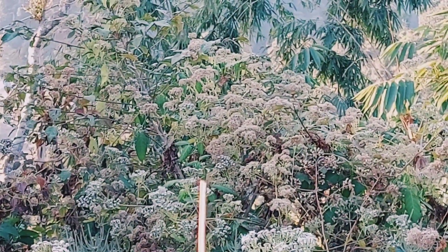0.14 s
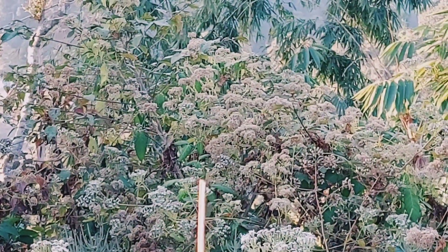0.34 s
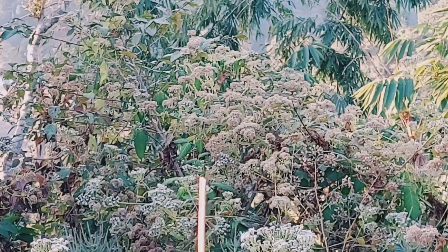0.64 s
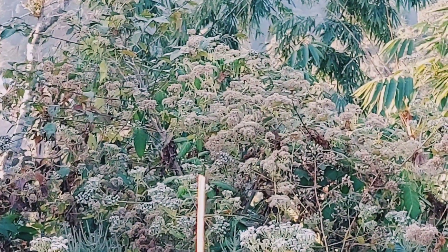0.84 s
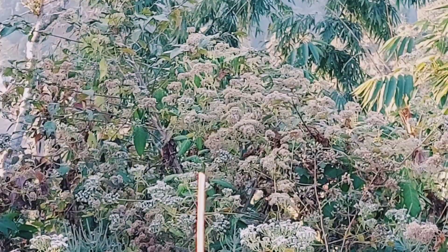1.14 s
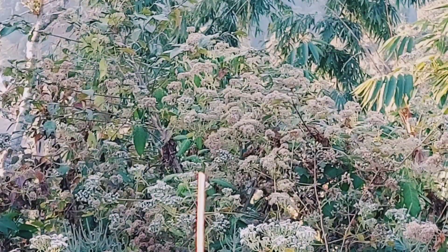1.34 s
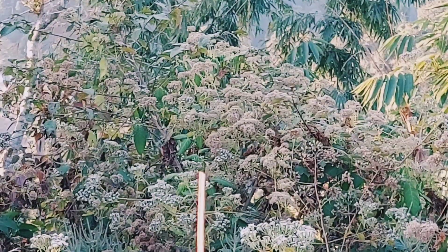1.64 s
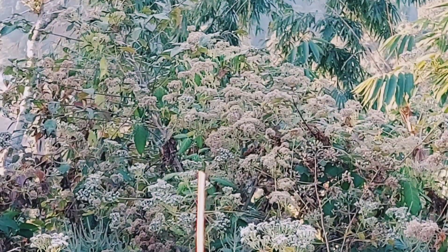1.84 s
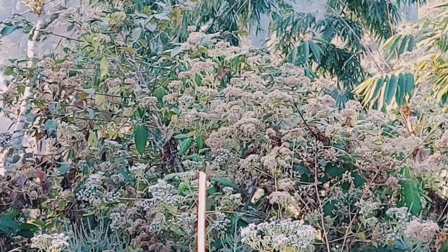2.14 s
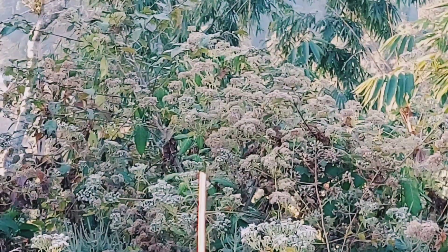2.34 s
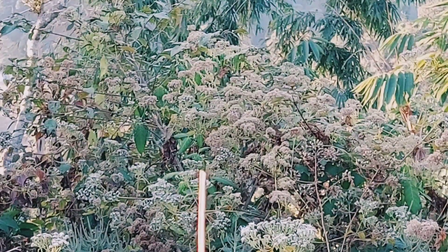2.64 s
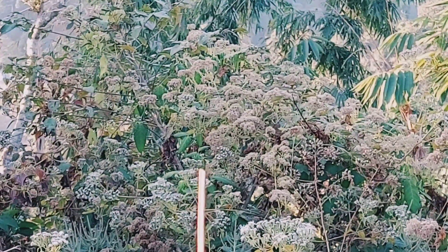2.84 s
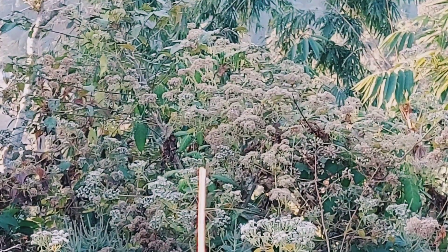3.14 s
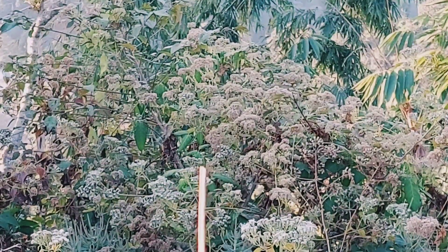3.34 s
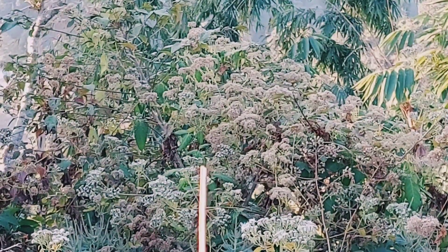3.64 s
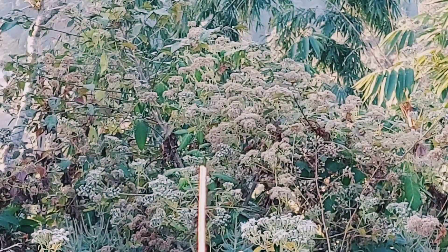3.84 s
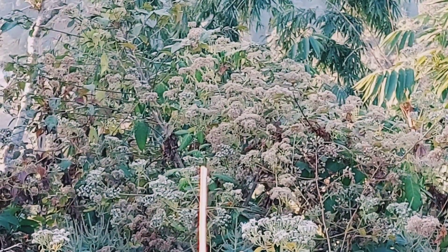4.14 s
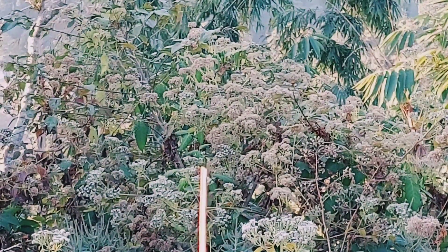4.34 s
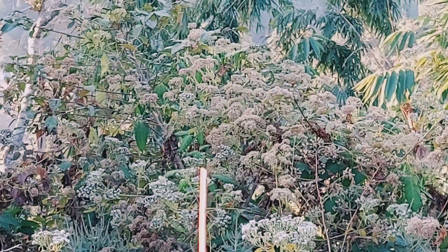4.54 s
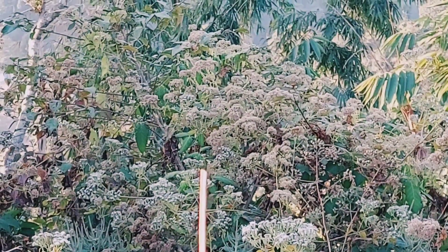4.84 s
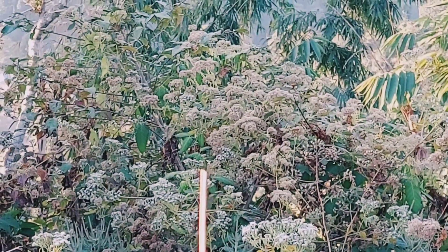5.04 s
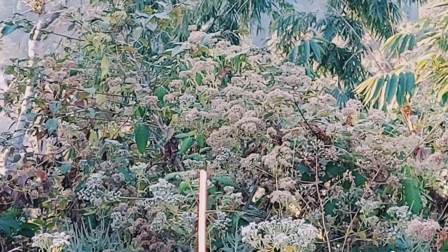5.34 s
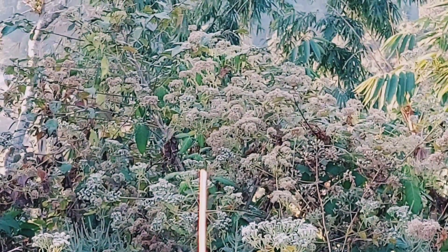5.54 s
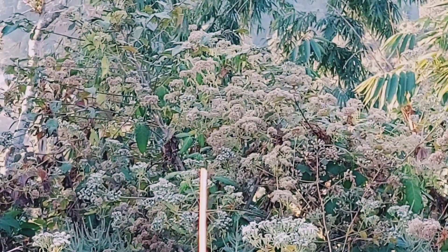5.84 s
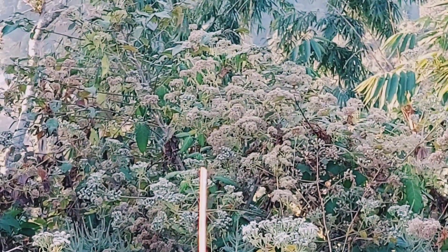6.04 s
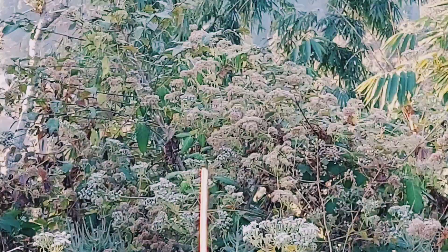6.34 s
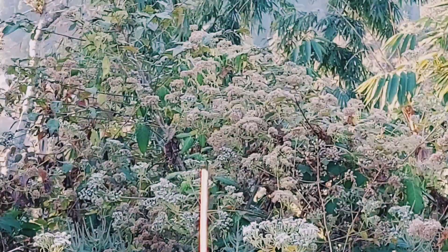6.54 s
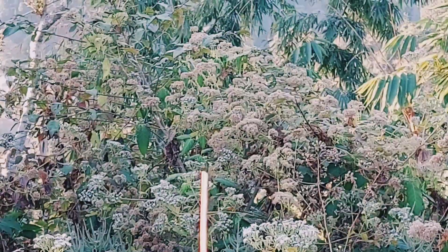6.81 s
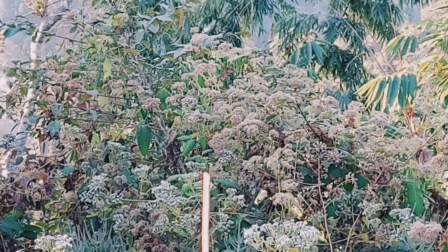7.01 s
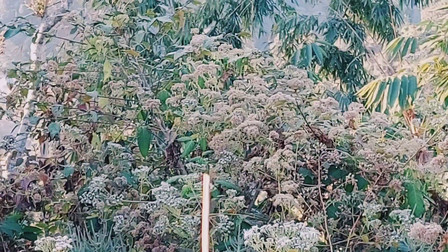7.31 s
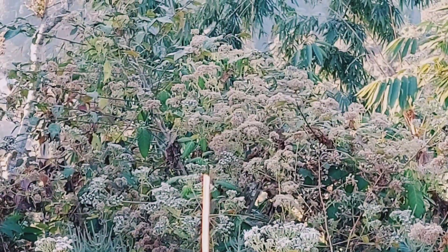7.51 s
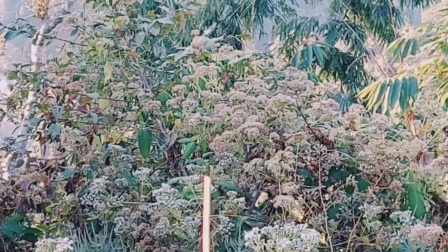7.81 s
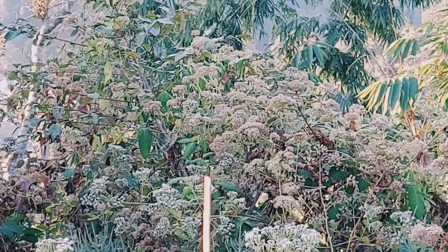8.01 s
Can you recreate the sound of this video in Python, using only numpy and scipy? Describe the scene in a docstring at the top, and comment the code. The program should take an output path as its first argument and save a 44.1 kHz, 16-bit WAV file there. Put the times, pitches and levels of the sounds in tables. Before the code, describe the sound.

Low bubbling bird triplets open, soon joined by a steady steep chirping bird, slurred notes and thin whistles, echoing softly among trees and leaves.

```python
"""A forest edge where birds call together: one repeats a steep chip, two trade low popping triplets,
others add down-slurs, toots and thin high whistles; a few small dry clicks sound close by.
Every note is a nearly pure tone gliding in pitch and level; decaying noise tails scatter it off
trunks and leaves. Shaped stereo noise makes the low rumble, far chorus and insect hiss behind."""
import sys
import numpy as np
from scipy import signal
from scipy.fft import rfft, irfft, next_fast_len
from scipy.io import wavfile
from scipy.ndimage import map_coordinates

SR = 44100
rng = np.random.default_rng(int(sys.argv[2]) if len(sys.argv) > 2 else 0)


def master_out(mix):
    """Clip the mix to full scale and print it as 16-bit PCM to the path in sys.argv[1]."""
    frames = np.transpose(np.atleast_2d(mix))
    ceiling = np.clip(frames, -1, 1)
    pcm = np.round(ceiling * 32767).astype(np.int16)
    wavfile.write(sys.argv[1], SR, pcm)


N = 360297


def amp(db):
    """Decibels to gain."""
    return 10 ** (np.asarray(db) / 20)


def unit(x):
    """Scale to rms 1."""
    return x / np.sqrt(np.mean(x ** 2) + 1e-20)


def along(points, hz):
    """Interpolate (Hz, value) points on a log frequency axis."""
    f, v = np.transpose(points)
    return np.interp(np.log(hz + 1), np.log(f + 1), v)


def sides(pan_db):
    """Left and right gains for a left-minus-right level difference."""
    return amp(np.array([[.5], [-.5]]) * pan_db)


def wobble(knots_per_s, size):
    """A smooth random curve through normally distributed knots."""
    knot_rng = np.random.default_rng(rng.integers(2 ** 31))
    knots = knot_rng.standard_normal(int(size * knots_per_s / SR) + 4)
    return map_coordinates(knots, [np.arange(size) * knots_per_s / SR])


def filtered(x, response):
    """Multiply the spectrum of x by a response of frequency in Hz."""
    m = next_fast_len(N + SR // 2)
    return irfft(rfft(x, m) * response(np.fft.rfftfreq(m, 1 / SR)), m)[..., :N]


def add(track, start_s, sound):
    """Mix a sound into a track, cut at the track's ends."""
    start = round(start_s * SR)
    part = sound[max(-start, 0):N - start]
    track[max(start, 0):][:len(part)] += part


def syrinx(hz, db, waver=0.003, overtone_db=-48):
    """A nearly pure tone that follows a pitch and a level, a little unsteady."""
    unsteady_hz = hz * (1 + waver * wobble(244.5, len(hz)))
    phase = 2 * np.pi * np.cumsum(unsteady_hz) / SR
    tone = np.sin(phase) + amp(overtone_db) * np.sin(2 * phase)
    return amp(db) * signal.windows.tukey(len(hz), .1) * tone


def sing(shape, notes, held=False, overtone_db=-48, flutter_db=2.0):
    """Repeat one note shape, never quite alike: sweeps vary in length, held notes in pitch."""
    knots_s, hz, level_db = np.transpose(shape)
    track = np.zeros(N)
    for start_s, db, factor, *swell_db in notes:
        length, pitch = (1, factor) if held else (factor, 1)
        t = np.arange(int(knots_s[-1] * length * SR)) / SR / length
        effort_db = db + sum(swell_db) * t / knots_s[-1]
        effort_db = effort_db + np.interp(t, knots_s, level_db) + flutter_db * wobble(142.0, len(t))
        note_hz = pitch * np.interp(t, knots_s, hz)
        add(track, start_s, syrinx(note_hz, effort_db, overtone_db=overtone_db))
    return track


def scatter_tail(t60_s, rise_s):
    """Stereo noise of unit energy per ear that builds up, then decays, as many echoes do."""
    t = np.arange(SR) / SR
    noise = rng.standard_normal((2, SR))
    return unit(noise * amp(-60 * t / t60_s) * (1 - np.exp(-(t / rise_s) ** 2))) / np.sqrt(SR)


def forest(voice, pan_db, direct_db, near_db, far_db, lag_s=0., near_t60_s=0.21, far_t60_s=0.91,
           shade=None):
    """One perch's path: direct sound (left ear lag_s later), near-leaf scatter, far-trunk tail."""
    echoes = amp(near_db) * scatter_tail(near_t60_s, 0.0036)
    echoes = echoes + amp(far_db) * scatter_tail(far_t60_s, 0.016)
    direct = sides(pan_db) * np.array([np.roll(voice, round(lag_s * SR)), voice])
    if shade:
        direct = filtered(direct, lambda hz: amp(along(shade, hz)))
    # Echoes arrive from all around, so only the direct sound shows where the bird sits.
    return amp(direct_db) * direct + signal.fftconvolve(voice[None], echoes, axes=1)[:, :N]


def chipper():
    """The nearest bird, to the right, runs through steep chips, slowing; each ends in a soft flick."""
    # Chip shape. Each row: time in s at length factor 1, pitch in Hz, relative level in dB.
    chip = [(0, 4436, 1), (.008, 4134, -6), (.013, 3956, 1.5), (.019, 3700, 1), (.025, 3452, -2.5),
            (.039, 2859, -4), (.054, 2440, -10), (.062, 2099, -18), (.072, 1900, -36), (.081, 2017, -18),
            (.089, 2154, -14), (.098, 1910, -18)]
    # Chips sung. Each row: start in s, level in dB, length factor.
    chip_notes = [(2.337, -35, .84), (2.563, -32, 1.02), (2.8, -32, 1), (3.037, -34, .98),
                  (3.282, -34, .97), (3.539, -33.5, 1.02), (3.79, -34, 1.01), (4.043, -34.5, 1.02),
                  (4.31, -36, 1.03), (4.581, -37.5, 1.02), (4.851, -38, 1.02), (5.14, -38, .98),
                  (5.421, -37.5, 1), (5.701, -36.5, .98), (6.019, -34.5, 1), (6.308, -35.5, .94),
                  (6.601, -36.5, 1.02), (6.909, -37, .99), (7.227, -37, 1.02), (7.552, -40, 1.06),
                  (7.86, -37.5, 1.06)]
    # Foliage colour on the direct path. Each row: frequency in Hz, gain in dB.
    foliage = [(2400, -1), (3100, 0), (3500, 2), (3800, 0), (4050, -6), (4400, -8)]
    voice = sing(chip, chip_notes, flutter_db=3.5)
    return forest(voice, pan_db=-6.5, direct_db=-.5, near_db=-6, far_db=-8, lag_s=-.00036,
                  near_t60_s=.17, far_t60_s=1.05, shade=foliage)


def phrases(figure, calls):
    """The notes of one figure, sung at every call."""
    return [(s + after_s, db + step_db, length)
            for s, db in calls for after_s, step_db, length in figure]


def poppers():
    """Two birds repeat low popping triplets, each at its own pace, so that they drift apart."""
    # Pop shape. Each row: time in s at length factor 1, pitch in Hz, relative level in dB.
    pop = [(0, 1400, -21), (.014, 1280, -14), (.021, 1160, -5), (.028, 1030, .5), (.035, 940, -7),
           (.046, 840, -20)]
    # Swelling triplets, last note drawn out. Each row: s after the call, level step in dB, length factor.
    near_figure = [(0, -7, 0.68), (.069, -3.5, .8), (.138, -0.5, 1.03)]
    far_figure = [(0, -7, .8), (.066, -2, 0.9), (.137, 0.5, 1)]
    # Calls of the near and far bird. Each row: start in s, level in dB before the figure's step.
    near_calls = [(-.007, -31.5), (.727, -30.5), (1.459, -31), (2.187, -31.5), (2.941, -31), (3.693, -30.5),
                  (4.436, -30.5), (6.357, -33), (7.083, -32), (7.816, -30.5)]
    far_calls = [(.05, -52), (.8, -53), (1.55, -45), (2.285, -44.5), (3.053, -50), (3.838, -44),
                 (4.606, -45), (5.368, -42.5), (6.118, -46), (6.871, -44.5), (7.627, -45)]
    near = sing(pop, phrases(near_figure, near_calls))
    far = sing(pop, phrases(far_figure, far_calls))
    return (forest(near, pan_db=5.3, direct_db=-2, near_db=-10.5, far_db=-9, lag_s=-.0003,
                   near_t60_s=.2, far_t60_s=1.8)
            + forest(far, pan_db=-1, direct_db=-2, near_db=-9, far_db=-7.5, lag_s=-.0003,
                     near_t60_s=.2, far_t60_s=1.7))


def slurrers():
    """Short and long down-slurs from the left, and two loud high ones from the right."""
    # Short, long and high slur shapes.
    # Each row: time in s at length factor 1, pitch in Hz, relative level in dB.
    slur = [(0, 2787, 0.5), (.014, 2334, 2.5), (.03, 1954, -14), (.05, 1620, -8.5), (.07, 1527, -4)]
    mew = [(0, 3250, -19), (.032, 2950, -9), (.042, 2600, -6.5), (.07, 2200, -6), (.11, 1870, -2.5),
           (.16, 1650, -15), (.2, 1530, -6.5)]
    tew = [(0, 5000, -15), (.02, 4655, -9), (.033, 4560, 1.5), (.055, 4310, -1.5), (.072, 4030, 2.5),
           (.081, 3850, -10.5), (.1, 3610, -7)]
    # Short slurs swell or fade. Each row: start in s, level in dB, length factor, level change in dB.
    slur_notes = [(.688, -55.5, 0.83, 6), (1.031, -56, 0.62, 10), (1.997, -51.5, .77, 2),
                  (2.312, -51.5, 0.61, 8.5), (2.598, -51.5, 1.05, 6), (2.917, -49.5, 0.61, 8.5),
                  (4.948, -51, 0.6, 2), (5.271, -48, 0.7, 0), (5.572, -42.5, 0.77, -0.5),
                  (5.882, -42, .88, -18), (6.228, -39, 0.97, -16), (6.56, -36, 1.04, -16),
                  (6.898, -47, .97, -8), (7.377, -55, 0.65, -2)]
    # Long and high slurs. Each row: start in s, level in dB, length factor.
    mew_notes = [(1.562, -37, 0.96), (5.382, -36, 0.99)]
    tew_notes = [(7.845, -33, 1.12), (8.032, -34, 1.01)]
    slurs = forest(sing(slur, slur_notes), pan_db=9.5, direct_db=-1.0, near_db=-2.5, far_db=-9,
                   lag_s=.00061)
    mews = forest(sing(mew, mew_notes), pan_db=4.5, direct_db=-.5, near_db=-3.5, far_db=-9,
                  lag_s=0.00012)
    tews = forest(sing(tew, tew_notes), pan_db=-10, direct_db=-3.5, near_db=-12.5, far_db=-12.5,
                  lag_s=-.00045)
    return slurs + mews + tews


def high_callers():
    """Thin arched notes ending in a quick drop, and lower rising whistles with a faint overtone."""
    # Two arched and two rising shapes.
    # Each row: time in s, pitch in Hz at pitch factor 1, relative level in dB.
    tsee = [(0, 5900, -7.5), (.022, 6330, 1), (.042, 6430, 4), (.048, 6000, -2), (.056, 4900, -15)]
    tsip = [(0, 6920, -9), (.025, 7970, 0), (.035, 8120, 6.5), (.045, 7200, -10), (.06, 6600, -34)]
    wee = [(0, 4500, -13), (.025, 4698, 7), (.05, 4800, 3), (.068, 5110, -8.5)]
    rise = [(0, 3000, -14), (.05, 3324, -11), (.075, 3710, 2), (.11, 3870, -1.5), (.15, 3720, -33)]
    # Notes sung on each. Each row: start in s, level in dB, pitch factor.
    tsee_notes = [(1.398, -51.5, 1.035), (1.822, -47.5, 0.96), (2.394, -42.5, .975), (2.516, -45, 1.015),
                  (5.085, -52, .99), (5.434, -39.5, .99), (5.556, -42, 1.01), (6.118, -39.5, .97),
                  (8.105, -52.5, 0.99)]
    tsip_notes = [(1.276, -59, 0.93), (6.694, -56.5, 0.93)]
    wee_notes = [(2.021, -47.5, .98), (2.694, -43, 0.98), (5.735, -43.5, 1)]
    rise_notes = [(2.201, -35, 0.95), (2.886, -36.5, .99), (5.918, -36.5, 1)]
    tsees = forest(sing(tsee, tsee_notes, held=True), pan_db=-6, direct_db=0, near_db=-7.5, far_db=-8,
                   lag_s=.00059, far_t60_s=.7)
    tsips = forest(sing(tsip, tsip_notes, held=True), pan_db=2, direct_db=1, near_db=0.5, far_db=-5.0,
                   far_t60_s=0.7)
    wees = forest(sing(wee, wee_notes, held=True, overtone_db=-28), pan_db=3, direct_db=-1,
                  near_db=-6, far_db=-8, lag_s=.00014)
    rises = forest(sing(rise, rise_notes, held=True, overtone_db=-32), pan_db=-3.5, direct_db=-2,
                   near_db=-8, far_db=-11, lag_s=.00036)
    return tsees + tsips + wees + rises


def duet():
    """A short toot from the left, then a falling moan from far to the right."""
    # Toot and moan shapes. Each row: time in s, pitch in Hz at pitch factor 1, relative level in dB.
    toot = [(0, 1449, -7), (.02, 1588, 5.5), (.04, 1560, 8), (.062, 1450, -2)]
    moan = [(0, 1303, -6.5), (.08, 1286, -1), (.16, 1240, -6), (.25, 1174, -7.5)]
    # About one a second. Each row: toot start in s, toot level in dB, toot pitch factor, moan level in dB.
    exchanges = [(.762, -53, 0.97, -61.5), (1.725, -51, 0.97, -59), (2.665, -50.5, 0.94, -55.5),
                 (3.625, -54, .95, -58.5), (4.586, -54, .97, -60), (5.559, -58.5, 0.91, -58.5),
                 (6.5, -55.5, .99, -60.5), (7.46, -56.5, .97, -56)]
    answer_s = .2
    toots = sing(toot, [(s, db, pitch) for s, db, pitch, _ in exchanges], held=True)
    moans = sing(moan, [(s + answer_s, db, 1) for s, _, _, db in exchanges], held=True)
    return (forest(toots, pan_db=4, direct_db=-1, near_db=-10, far_db=-10, lag_s=.00066)
            + forest(moans, pan_db=-14.5, direct_db=1.5, near_db=-9, far_db=3, lag_s=-.00011))


def warble(start_s, length_s, hz, depth, arches_per_s, db):
    """A far bird swings its pitch in quick, even arches, louder at the top."""
    t = np.arange(int(length_s * SR)) / SR
    arch = np.abs(np.sin(np.pi * arches_per_s * t))
    track = np.zeros(N)
    add(track, start_s, syrinx(hz * (1 + depth * arch), db + 4 * arch))
    return track


def tik_runs(count=4):
    """Evenly spaced tiks, from a loose series to a fast chatter."""
    # Tik shape. Each row: time in s, pitch in Hz, relative level in dB.
    tik = [(0, 5210, -11), (.008, 4620, -1.5), (.017, 3500, -10)]
    # Runs. Each row: start in s, level in dB, gap between tik starts in s.
    runs = [(1.687, -55, 0.039), (3.154, -52, 0.055), (6.266, -50, 0.014)]
    return sing(tik, [(s + k * gap_s, db, 1) for s, db, gap_s in runs for k in range(count)])


def stray_whistles():
    """Single gliding whistles, each held note at its own pitch."""
    # Three whistle shapes. Each row: time in s, pitch in Hz at pitch factor 1, relative level in dB.
    lilt = [(0, 3050, -10), (.05, 3385, -4.5), (.1, 3490, 1), (.2, 3480, -13)]
    seep = [(0, 7000, -7), (.035, 6410, -2), (.075, 6300, -5.5)]
    zip_shape = [(0, 4720, 4), (.013, 5100, -5), (.026, 5450, -17.5)]
    # Notes sung on each. Each row: start in s, level in dB, pitch factor.
    lilt_notes = [(1.12, -65, .82), (1.341, -63.5, 0.69), (2.078, -52, 0.87), (2.45, -46, 1),
                  (4.895, -49.5, 1.24), (6.77, -54.5, 1.08)]
    seep_notes = [(.052, -64.5, 0.98), (.188, -66, 1.03), (.335, -72, 1.02), (1.53, -57.5, .76),
                  (1.86, -61.5, .4), (2.73, -55, .38), (5.054, -58, .5), (6.805, -56, .96)]
    zip_notes = [(3.303, -55, 1.08), (3.424, -53, 1.03), (4.81, -49.5, .8), (6.604, -53, 1.27),
                 (6.855, -63, 1.25)]
    return (sing(lilt, lilt_notes, held=True) + sing(seep, seep_notes, held=True)
            + sing(zip_shape, zip_notes, held=True))


def darting(length_s, hz, db, spread, turns_per_s):
    """A note that swells and fades while its pitch darts about at random."""
    u = np.linspace(-1, 1, int(length_s * SR))
    darting_hz = hz * np.exp(spread * wobble(turns_per_s, len(u)))
    return syrinx(darting_hz, db - 9 * u ** 2 + 3 * wobble(turns_per_s, len(u)))


def twitters_and_rasps():
    """Thin twitters dart slowly in pitch; harsh rasps dart fast enough to roughen the tone."""
    # Twitters. Each row: start in s, length in s, peak level in dB.
    twitters = [(2.231, .05, -63.5), (3.482, 0.17, -70.5), (4.002, 0.76, -71), (4.854, 0.18, -67),
                (6.469, .07, -62.5), (7.445, 0.055, -66), (7.566, 0.21, -66)]
    # Rasps. Each row: start in s, length in s, centre pitch in Hz, peak level in dB.
    rasps = [(0.867, .12, 3890, -64.5), (1.159, 0.041, 4780, -59.5), (1.851, .12, 2530, -62),
             (6.553, .11, 3154, -43.5)]
    track = np.zeros(N)
    for start_s, length_s, db in twitters:
        add(track, start_s, darting(length_s, 6660, db, spread=0.032, turns_per_s=92))
    for start_s, length_s, hz, db in rasps:
        add(track, start_s, darting(length_s, hz, db, spread=0.113, turns_per_s=800))
    return track


def strays():
    """Birds deeper in the trees: single whistles, tiks, a warble, twitters and rasps."""
    track = warble(start_s=0.018, length_s=0.474, hz=3126, depth=0.097, arches_per_s=16, db=-74)
    track += tik_runs() + stray_whistles() + twitters_and_rasps()
    return forest(track, pan_db=-2.5, direct_db=0.5, near_db=0.5, far_db=-5.5,
                  near_t60_s=0.13, far_t60_s=0.8)


def clicks():
    """Brief bright snaps of decaying, high-passed noise, too close to raise an echo."""
    # Snaps. Each row: start in s, level in dB before the high-pass and pan.
    snaps = [(8.058, -58), (8.075, -58), (8.153, -42)]
    t60_s, corner_hz, pan_db = 0.02, 4500, 11
    track, t = np.zeros(N), np.arange(SR // 20) / SR
    for start_s, db in snaps:
        add(track, start_s, amp(db - 60 * t / t60_s) * rng.standard_normal(len(t)))
    return sides(pan_db) * filtered(track, lambda hz: 1j * hz / (corner_hz + 1j * hz))


def rush(spectrum):
    """Stereo noise of rms 1, partly alike in both ears: the mid/side balance sets the likeness."""
    # Ear likeness. Each row: frequency in Hz, left-right correlation.
    likeness = [(60, 0.41), (400, 0.23), (1100, -0.23), (5000, -0.3), (8000, 1), (15000, 0.95)]
    # Stereo tilt. Each row: frequency in Hz, left-minus-right level in dB.
    tilt = [(100, -1.1), (300, 3.5), (1100, 4.5), (5000, -4), (9000, 0.5), (15000, 0.5)]

    def mid_side_gains(hz):
        angle = np.arccos(np.clip(along(likeness, hz), -1, 1)) / 2
        return amp(along(spectrum, hz)) * [np.cos(angle), np.sin(angle)]

    mid, side = filtered(rng.standard_normal((2, N)), mid_side_gains)
    return unit(filtered(np.array([mid + side, mid - side]), lambda hz: sides(along(tilt, hz))))


def background():
    """A low far rumble and a wash of distant birds and insects: noise that drifts in level."""
    # Rumble spectrum. Each row: frequency in Hz, relative density in dB per Hz.
    rumble_spectrum = [(15, -82), (25, -25), (49, -2.5), (81, 0), (128, -5.5), (162, -10.5), (250, -11.5),
                       (432, -20.5), (650, -22), (840, -35), (1430, -120)]
    # Far chorus, insects and hiss. Each row: frequency in Hz, relative density in dB per Hz.
    air_spectrum = [(350, -46), (600, -22.5), (777, -15), (993, -9.5), (1200, -10), (1690, -17.5),
                    (2840, -17), (3340, -15.5), (4040, -18.5), (5030, -5), (5600, -10), (6170, -20),
                    (6690, -20.5), (7560, -28), (15600, -31)]
    rumble_db, air_db = -62, -60.5
    rumble = amp(rumble_db + 0.11 * wobble(3.04, N)) * rush(rumble_spectrum)
    return rumble + amp(air_db + 0.33 * wobble(1.79, N)) * rush(air_spectrum)


def scene():
    """All birds and clicks over the forest's background."""
    birds = chipper() + poppers() + slurrers() + high_callers() + duet() + strays()
    return birds + clicks() + background()


def record(dry):
    """A sharp band limit: nothing from top_hz up passes."""
    top_hz = 15720
    return filtered(dry, lambda hz: hz < top_hz)


dry = scene()
out = record(dry)
master_out(out)
```